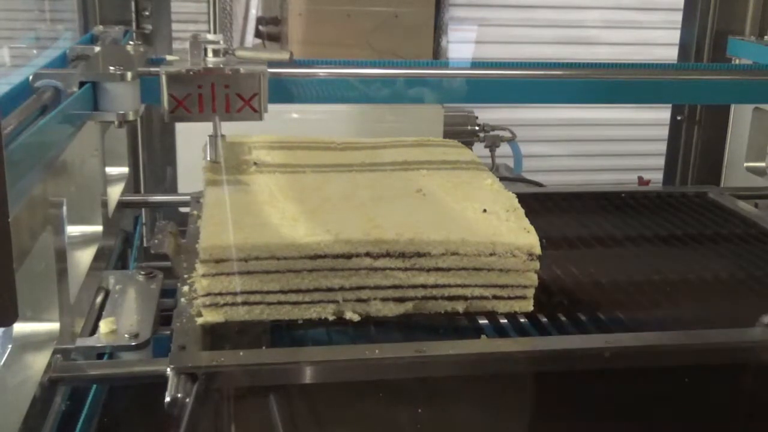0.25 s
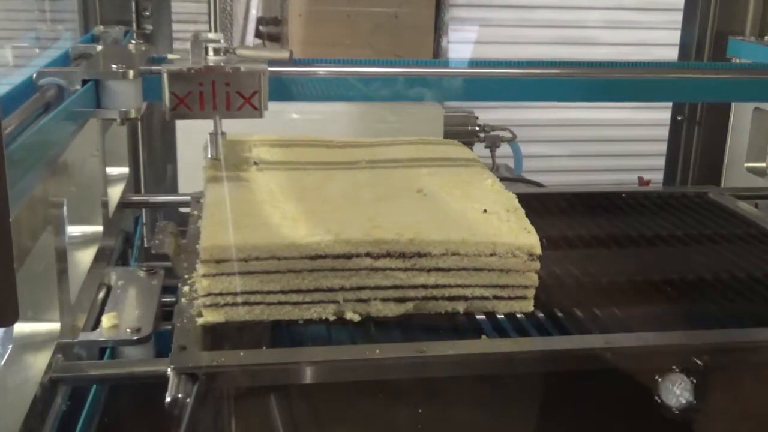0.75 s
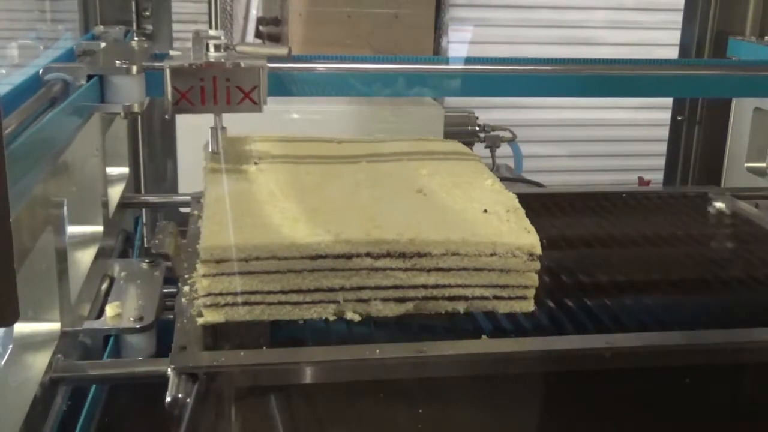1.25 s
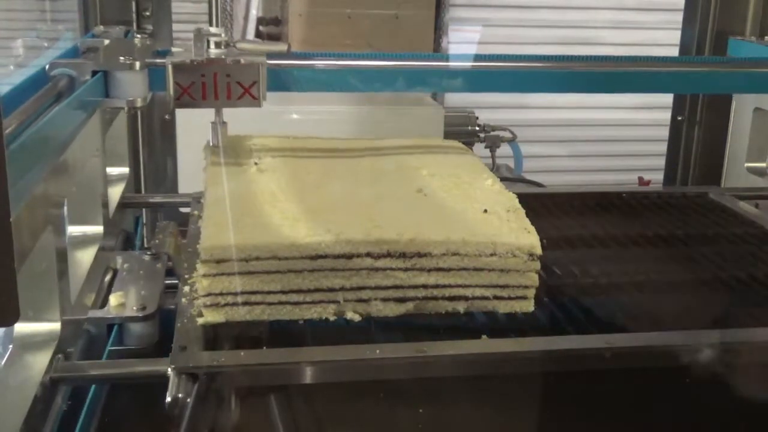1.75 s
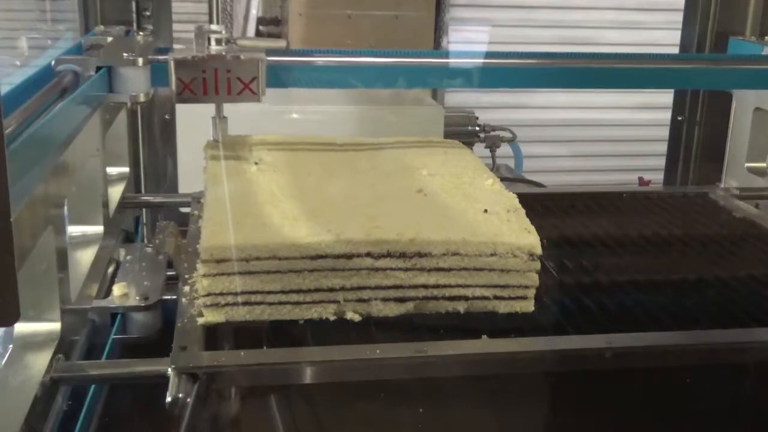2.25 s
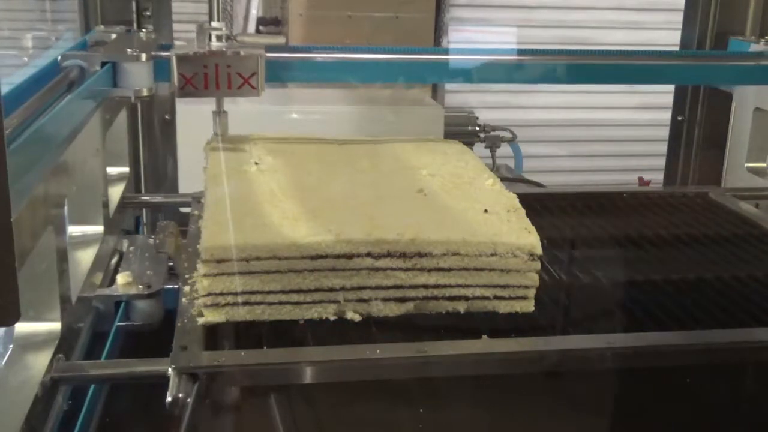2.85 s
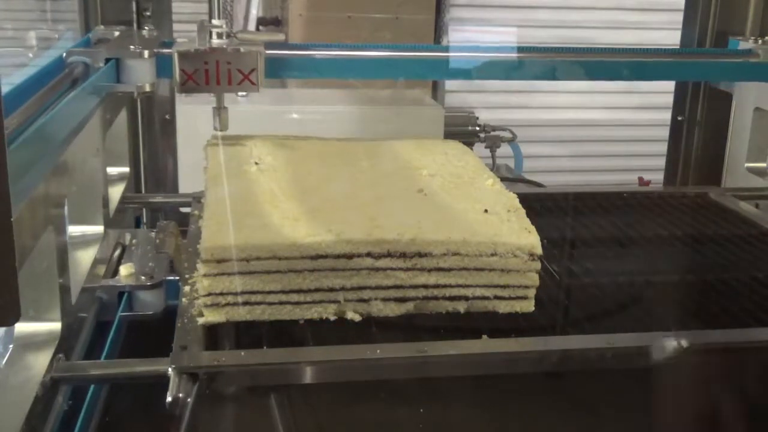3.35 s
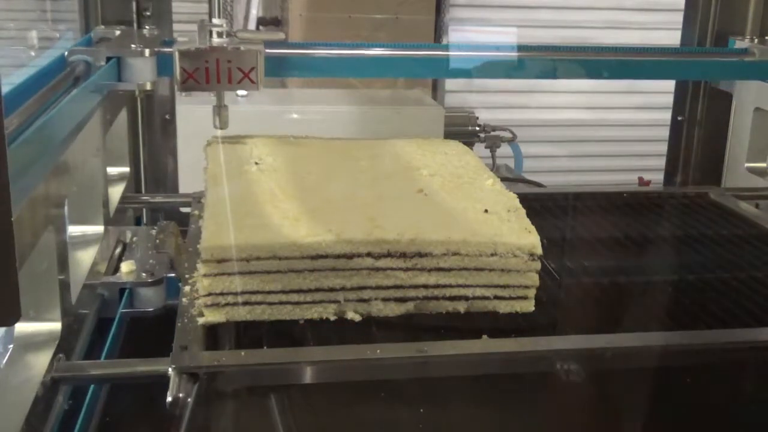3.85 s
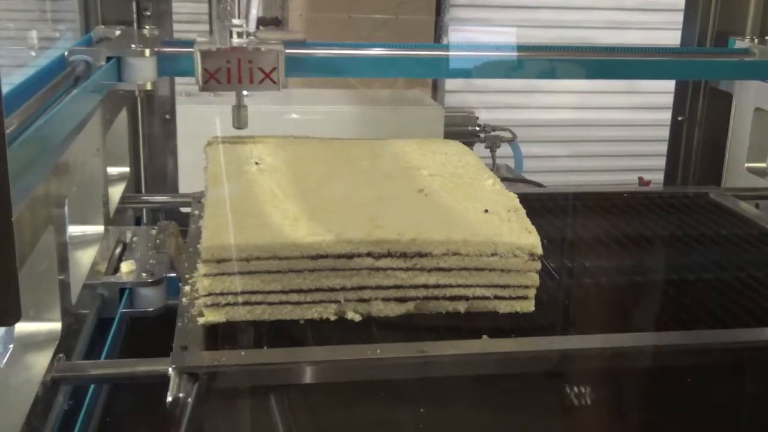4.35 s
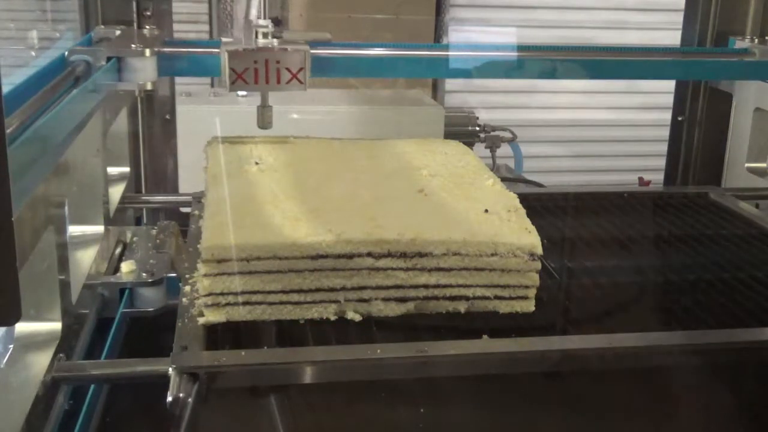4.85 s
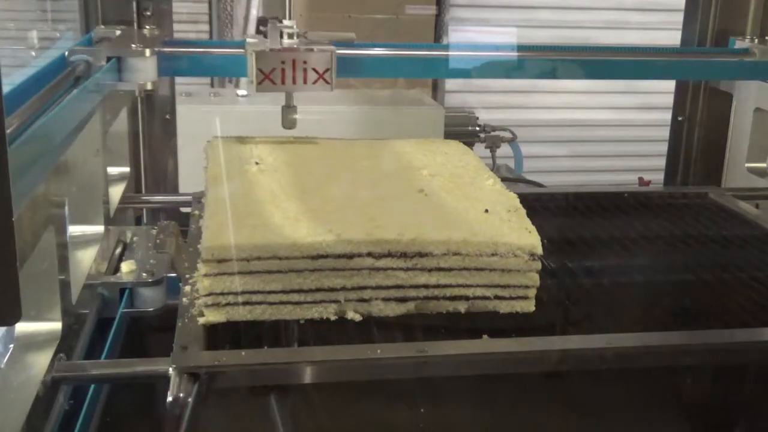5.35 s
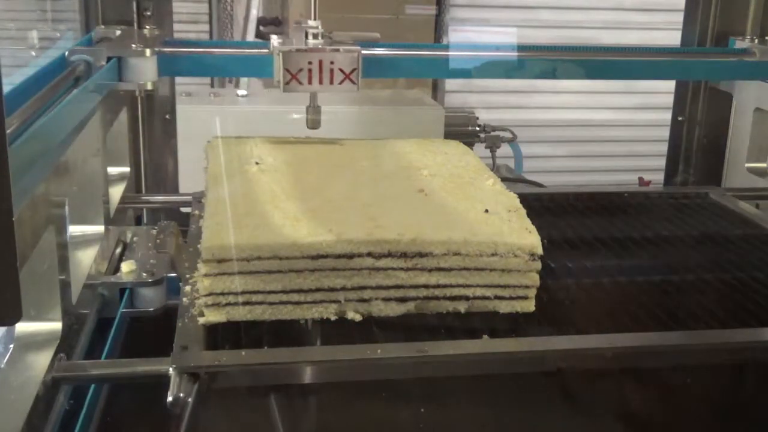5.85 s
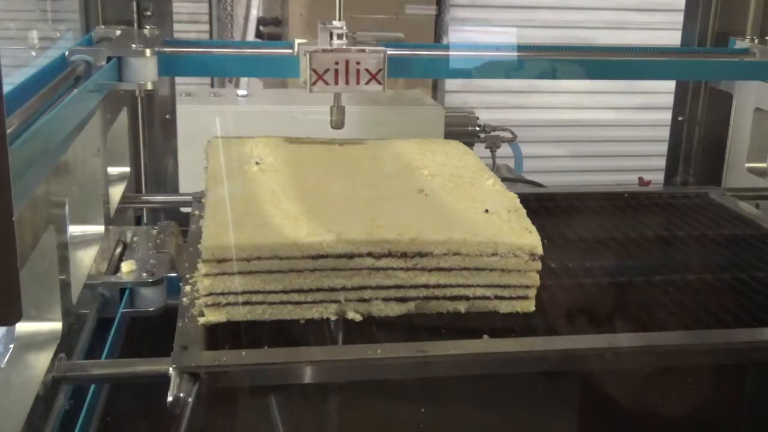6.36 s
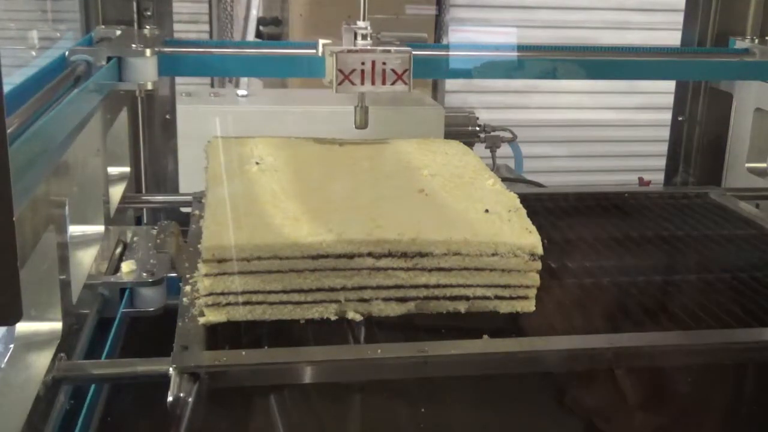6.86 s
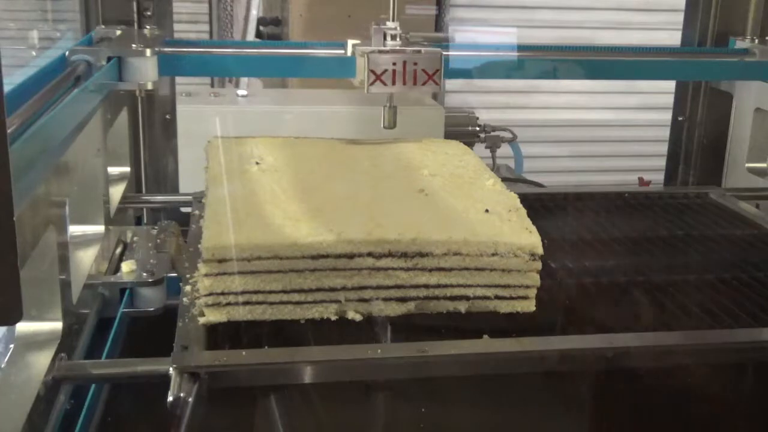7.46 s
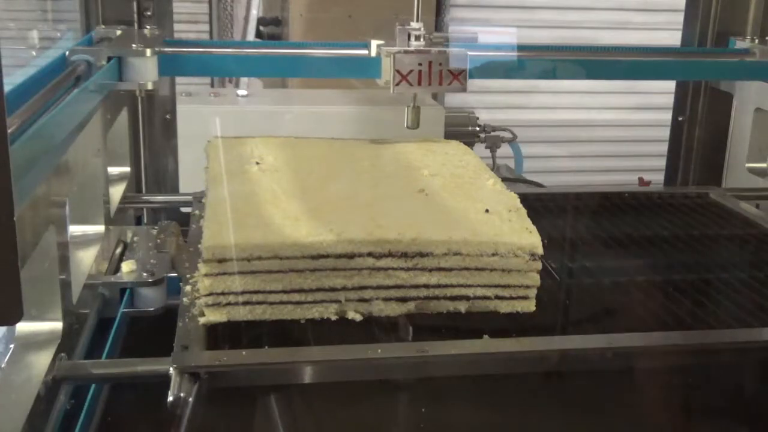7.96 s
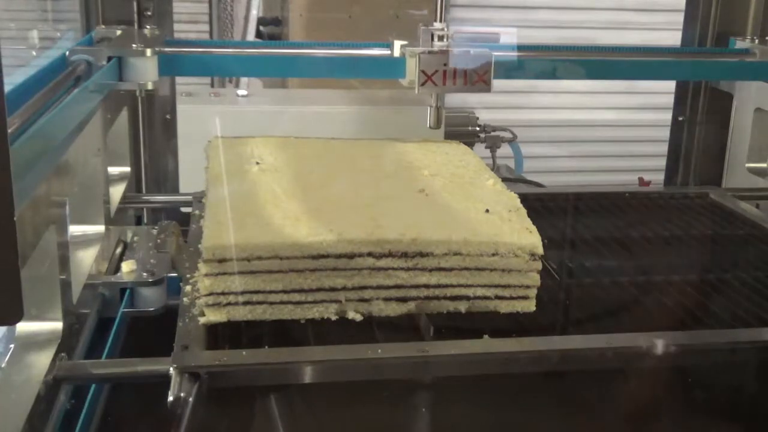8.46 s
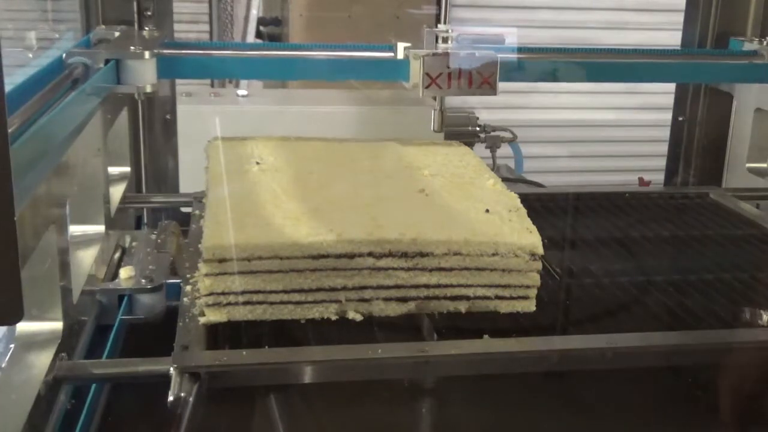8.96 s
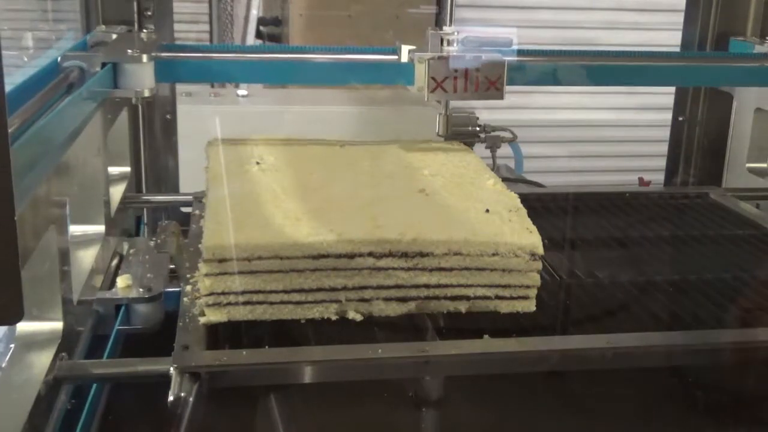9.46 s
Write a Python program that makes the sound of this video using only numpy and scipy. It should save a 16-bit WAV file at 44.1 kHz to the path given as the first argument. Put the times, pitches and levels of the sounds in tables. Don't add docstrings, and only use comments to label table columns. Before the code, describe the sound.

Steady mid-to-high pump whine and cooling-fan rush, heard in stereo from a few metres off in a workshop. A short air burst with rattling metal clicks comes first, then the whine swells and changes colour. After further puffs and taps, a fierce water-jet hiss takes over abruptly and stays, splashing and ringing metal slats, with a soft thud and groan of the frame midway. The recording level ducks the pumps beneath it.

```python
import sys
import numpy as np
from scipy import signal
from scipy.fft import rfft, irfft
from scipy.io import wavfile
from scipy.ndimage import uniform_filter1d, map_coordinates

SR = 44100
rng = np.random.default_rng(int(sys.argv[2]) if len(sys.argv) > 2 else 0)


def bounce(signal):
    frames = np.transpose(np.atleast_2d(signal))
    limited = np.clip(frames, -1, 1)
    pcm = np.round(limited * 32767).astype(np.int16)
    wavfile.write(sys.argv[1], SR, pcm)


def undo_db(level):
    steps = np.asarray(level, float) / 20
    return 10 ** steps


N = 427769
HZ, FRAME_S = np.fft.rfftfreq(2048, 1 / SR), np.arange(N // 512 + 5) * 512 / SR

# (time [s], speed [turns/s])
SHAFT_SPEED = [
    (0, 29.872),
    (3.8, 29.872),
    (4.0, 29.75),
    (5.5, 29.75),
    (5.8, 28.5),
    (5.9, 28.7),
    (6.08, 29.75),
    (9.7, 29.75),
]
# (order [per turn], level [dB rms], left minus right [dB], left lead [rad])
PISTON_ORDERS = [(9, -39, 0, -0.2), (18, -38, -1, -0.0), (27, -33, 3, -0.7), (36, -34, 0, 1.2),
                 (45, -35, 14, -1.1), (54, -42, 1, -0.4), (63, -46, -6, 0.1), (72, -55, 1, 0.7),
                 (81, -51, 2, -0.9), (90, -54, 6, -0.3), (99, -50, -3, -0.7), (108, -43, 4, 0.1),
                 (117, -52, -12, 0.3), (126, -48, 1, 1.7), (135, -49, 5, 0.0), (144, -47, 3, -0.1),
                 (153, -57, 4, 0.5), (162, -57, -6, -0.2), (171, -51, 1, 0.4), (180, -44, 7, -2.1),
                 (198, -57, 7, -0.6), (207, -58, -2, 1.3), (216, -44, 5, -0.6), (279, -59, -2, 0.1),
                 (324, -60, 0, -0.1), (333, -62, -2, -0.2)]
# (order [per turn], level [dB rms], left minus right [dB], left lead [rad])
GEAR_ORDERS = [(12, -41, 6, -1.0), (24, -37, 1, 0.4), (48, -54, 10, 0.3), (60, -49, 2, -0.2),
               (84, -60, -2, 0.1), (96, -44, 0, -0.1), (120, -55, 1, 0.1), (132, -55, 0, 0.0),
               (156, -47, 2, -0.3), (168, -46, -4, -0.4), (192, -48, 3, -0.7), (204, -45, 10, -2.0),
               (228, -58, -3, -1.9), (264, -56, -1, -0.2), (276, -56, -2, 0.1), (300, -56, 0, 0.1),
               (312, -63, 0, 0.1), (348, -63, -1, -0.1)]
# (order [per turn], level [dB rms], left minus right [dB], left lead [rad])
UNBALANCE_ORDERS = [(4, -54, 0, -0.1), (21, -53, -3, -0.0), (11, -55, 0, 0), (20, -55, 0, 0),
                    (23, -55, 0, 0), (39, -60, 0, 0), (41, -58, 0, 0), (49, -54, 0, 0), (145, -54, 0, 0),
                    (170, -54, 0, 0), (187, -59, 0, 0), (193, -55, 0, 0), (215, -54, 0, 0),
                    (217, -55, 0, 0), (40, -55, 0, 0), (42, -62, 0, 0), (44, -52, 4, 0), (50, -55, 0, 0),
                    (25, -47, 0, -0.7), (26, -48, 0, -0.5), (55, -55, 9, -0.8), (61, -53, 2, -1.2),
                    (62, -52, -3, -0.7), (65, -50, -11, 0.8), (70, -54, 2, 0.4), (74, -55, 5, -0.4),
                    (85, -55, 2, -0.3), (107, -52, 5, -0.4), (109, -50, 1, -0.1), (143, -56, 0, -0.4),
                    (155, -53, 2, -0.2), (157, -47.5, 3, 0.1), (167, -49, 9, -0.2), (169, -52, -3, -1.1),
                    (173, -53, 0, -1.0), (181, -54, 5, -0.8), (191, -48, 6, 0.9), (202, -54, 2, 0.3),
                    (205, -52, 1, 1.4), (278, -49, 0, -0.4), (347, -61, 2, -0.1), (350, -63, -2, -0.3),
                    (361, -69, 0, -0.1)]
# (frequency [Hz], level [dB])
FAINT_COLOUR = [(30, -20), (300, -7), (800, -2), (1200, 0), (2400, -9), (3000, 1), (4600, -5), (5600, 0),
                (7500, -11.5), (10000, 2), (11000, -24)]
FAINT_DB = -65
WOBBLING_ORDERS = np.array([26, 108])
# (time [s], share of full [1])
OIL_PRESSURE = [(0, .04), (.7, 0), (1.5, 0), (2.2, 0), (2.65, .05), (2.9, .4), (3.2, .9), (3.75, 1.02),
                (4.05, .8)]
PRESSED_ORDERS = (9, 12, 18, 24, 27, 45, 63, 156, 180)
PRESSED_FACTOR = [1.3, 1.5, .52, 1.05, 1.45, -.25 + .62j, 2.8, 1.7, 2.4]
PRESSED_TRIM = [-2.7, -4.6, -8, .4, 1.8, 2.4, -3.5, -2, -1]
# (time [s], share of full [1])
JET_LOAD = [(3.8, 0.52), (4.5, 0.94), (5.4, 1.05), (5.7, 0.31), (6.3, 1.1), (8, 1.16), (9.7, 1.24)]
LOADED_GAIN = [3, 8.5, 17.5, -6, -6]
# (order [per turn], left [dB], right [dB])
SAGGING_ORDERS = [
    (12, -1, -1),
    (24, -3.5, -3),
    (27, -.5, -5),
]
SWITCH_S, SWITCH_WIDTH_S = 2.75, .5
# (time [s], right level [dB rms], phase [rad])
GEAR_MESH = [(0, -28, -2), (.3, -30.5, -2.5), (.9, -39.5, -2.5), (1.4, -33.5, -2.5), (1.65, -39, -2.95),
             (1.9, -38, -3), (2.3, -40, 1), (2.55, -31.5, -0.4), (2.8, -23, -1.7), (2.97, -27, -2.5),
             (3.2, -36, 0.9), (3.5, -45, 1), (3.75, -45, -2)]
WHINE_DB = -1.4
SKIP_S, SKIP_SAMPLES = 1.93, 1024

# (frequency [Hz], density [dB per Hz])
FAN_COLOUR = [(45, -22), (75, -7.5), (110, -10), (165, -5.5), (195, -4.5), (300, -1), (470, -2.5),
              (670, 0.5), (1200, -0.5), (2000, -2.5), (2450, -5.5), (3000, -3), (5900, -3), (8700, -5.5),
              (11000, -14.5)]
FAN_DB = -34.5
# (frequency [Hz], left-right likeness [1])
FAN_LIKENESS = [(60, 1), (130, 0.89), (270, 0.95), (1200, 0.59), (5000, 0.31), (11000, 0.97)]
# (frequency [Hz], level [dB rms])
BLADE_TONES = [(166.9, -58.5), (672.9, -55.0)]

# (time [s], level [dB], hold [s], t60 [s], tilt [dB per octave])
VALVE_PUFFS = [
    (0.642, -23, 0.019, 0.097, 0.5),
    (0.689, -31.5, 0.018, .25, -2),
    (3.16, -37, .01, .08, 0.1),
    (3.247, -31, 0.076, 0.087, 1),
    (3.728, -26.5, 0.028, 0.17, 2),
]
# (frequency [Hz], density [dB per Hz])
PUFF_COLOUR = [(240, -38), (400, -22), (741, -8), (1370, 0), (1580, -17), (1740, -3), (2510, -4),
               (3820, -2.5), (7080, -7.5), (9910, -7), (11400, -34), (14800, -65), (22000, -120)]
# (frequency [Hz], width [Hz], level [dB])
VALVE_BODY = [(1880, 140, 5.5), (2630, 200, 9), (3300, 250, 3), (4560, 300, 7), (7140, 500, 7),
              (8850, 300, 1), (9880, 250, 6)]
TAIL_DB, TAIL_T60_S, TAIL_LOSS_DB_PER_S = -7, 0.76, 140

# (time [s], level [dB])
SPOOL_STRIKES = [(.650, -36), (.654, -29), (.658, -24), (.662, -27), (.666, -28), (.672, -30), (.678, -34),
                 (.688, -30), (.697, -34), (.703, -31), (.710, -34), (.724, -36), (.742, -37), (.762, -35),
                 (.798, -36), (.83, -38), (3.172, -38), (3.257, -34), (3.268, -33), (3.283, -34),
                 (3.293, -32), (3.304, -32), (3.317, -38), (3.739, -35), (3.745, -33), (3.756, -37),
                 (3.80, -31)]
# (frequency [Hz], level [dB], t60 [s])
SPOOL_MODES = [(1920, -14, .04), (2590, -3, .045), (3000, -5, .03), (3505, -1, .04), (4100, -4, .03),
               (4560, -1, .045), (5100, -2, .04), (6008, -6, .04), (6826, -6, .03), (7386, -2, .03),
               (8500, -5, .03)]

# (time [s], level [dB], frequency [Hz], width [Hz], t60 [s])
HEAD_TAPS = [(3.739, -30, 1900, 50, .3), (3.739, -30, 500, 300, .08), (3.74, -32, 1300, 300, .08),
             (3.815, -20, 1950, 120, .2), (3.82, -24, 1450, 200, .3), (4.075, -30, 298, 150, .3),
             (4.19, -20, 1250, 400, .1), (5.53, -23, 278, 80, 0.28), (.65, -25, 1350, 250, .05),
             (.658, -29, 850, 200, .07), (.68, -33, 1300, 300, .12), (3.738, -23, 5400, 900, .06),
             (3.799, -22, 5500, 900, .05), (3.862, -19, 1400, 200, .15), (5.475, -19, 2600, 500, .1),
             (5.435, -22, 900, 503, .15)]
# (time [s], level [dB], frequency [Hz], width [Hz],
# t60 [s])
SLOW_GROANS = [
    (4.1, -35, 211, 40, 2.5),
    (5.47, -31.5, 85, 30, .6),
    (5.75, -30, 231, 30, 2.3),
    (5.8, -18.5, 336, 4.1, 0.64),
    (5.9, -28, 264.4, 12.5, 1.4),
    (8.55, -22.5, 394, 10, 0.66),
]
# (frequency [Hz], width [Hz], level [dB], t60 [s])
FRAME_MODES = [(129, 50, -30, 0.47), (221, 22, -19, 0.48), (335, 77.6, -21, 0.69), (473, 80, -23, .4),
               (630, 36, -22, 0.32), (711, 50, -20, .3), (1150, 120, -21, 0.54)]
THUD_S = 5.454
TAP_RISE_S, GROAN_RISE_S, THUD_RISE_S = .004, 0.055, 0.017

JET_OPENS_S, JET_RISE_S, JET_DB, SETTLE_S = 3.792, 0.041, -19, 0.3
# (frequency [Hz], density [dB per Hz])
JET_COLOUR = [(110, -41), (230, -12), (480, -11), (800, -6), (1500, -2), (2200, -1.8), (4100, 2), (5200, 0),
              (5800, 1.45), (7150, -3), (7900, 0.2), (8800, 7.5), (9700, 5.5), (11000, -5)]
# (centre [Hz], width [octaves], gained over the cut [dB], while settling [dB])
JET_PARTS = [
    (810, 1.85, 6, -3.5),
    (4100, 0.69, 1.5, -0.5),
    (8900, 0.32, -2.5, -0.5),
]
# (time [s], depth share [1], splash share [1])
CUT_DEPTH = [(3.8, 0.018, .1), (4.4, 0.27, 0.5), (5.1, 0.14, 0.19), (5.9, 0.21, 0.46), (6.7, 0.27, 0.56),
             (7.4, 0.46, 0.8), (7.9, 0.61, 0.62), (8.7, 0.59, 0.4), (9.2, 1.3, 0.71), (9.7, 1.2, 0.87)]
# (time [s], centre [Hz], level [dB])
SLOT_RING = [(3.8, 4100, -0.5), (5, 3900, 0), (5.8, 3800, 0.5), (6.3, 3700, 1), (6.8, 3840, 2),
             (7.2, 3700, 0.5), (7.7, 4150, 3.5), (8.1, 3900, 1), (8.6, 4000, 3), (9.0, 4380, 1),
             (9.4, 4440, 3.5), (9.7, 4330, 0.5)]
SLOT_WIDTH_HZ = 620
# (frequency [Hz], width [Hz], level [dB])
TANK_RINGS = [(218.4, 31, 5), (313, 41, -13), (397, 40, 1), (463, 72, -6), (658, 34, -12), (717, 29, 8),
              (900, 29, 7), (946, 28, -11), (1400, 81, -3), (1154, 35, 5), (1368, 15, 10), (1630, 24, 6),
              (1772, 19, 7.5), (1937, 14, 7), (2082, 35, 7), (2262, 30, 7.5), (2448, 14, 11),
              (2772, 19, 10), (3380, 33, 2), (3740, 32, -1), (4000, 16, 1), (6480, 19, 7.5), (7900, 50, 3),
              (8220, 59, 5.5), (8550, 40, 3), (8820, 30, 2), (8725, 25, 3.5), (8930, 23, 2.5)]
# (time [s], half length [s], frequency [Hz], width [Hz],
# level [dB])
PASSING_RINGS = [(3.95, 0.14, 1600, 300, -3), (4.35, .35, 1870, 38, 5), (4.5, 0.77, 1150, 56, 1.5),
                 (4.6, .5, 470, 120, -5), (4.8, 0.44, 2500, 150, 2), (5.15, 0.17, 1800, 250, -1),
                 (5.7, 0.49, 1420, 40, 10), (6.7, .35, 1630, 46, 8), (6.65, 0.22, 1000, 400, 4.5),
                 (7.2, 0.38, 1100, 60, 4), (7.55, 0.42, 930, 70, 5.5), (7.8, 0.23, 1600, 300, -3),
                 (8.3, 0.35, 1170, 200, -3.5), (8.1, 0.49, 427, 120, 8), (8.4, .5, 2000, 80, -2),
                 (9.3, 0.56, 1670, 60, 7), (9.6, 0.47, 430, 120, 5.5), (4.1, .2, 320, 150, 5),
                 (5.1, 0.18, 1150, 300, 2.5), (5.7, 0.18, 780, 120, -1), (4.02, .05, 2300, 1400, -2.5),
                 (5.75, .15, 1620, 80, -4), (6.85, 0.18, 1500, 400, 1.5), (7.1, .2, 6500, 1500, 1),
                 (8.2, 0.74, 1010, 100, 4), (5.0, .3, 430, 80, -4), (6.1, 0.22, 680, 300, 3),
                 (9.35, .2, 1050, 230, 2.5), (8.6, .2, 3200, 800, 1), (6.4, .2, 6100, 1500, -1.5),
                 (6.1, .25, 280, 120, 4), (7.3, .9, 3800, 370, 1), (6.3, 0.18, 3100, 600, -1.5),
                 (6.85, .3, 5700, 900, -1), (6.9, 0.19, 2100, 700, -3), (7.3, .2, 3100, 800, 1.5),
                 (8.1, .3, 2600, 300, 2)]
# (frequency [Hz], left-right likeness [1])
JET_LIKENESS = [(60, .98), (200, 1), (480, 0.88), (1360, 0.8), (3870, 0.84), (6200, 0.73), (8600, 0.96),
                (11000, 0.83)]
# (frequency [Hz], left minus right [dB])
JET_PAN = [(60, 0.0), (170, 0.0), (480, -0.89), (1360, 0.31), (3870, -1.8), (11000, 0.77)]
# (time [s], gain [dB])
GAIN_CONTROL = [
    (3.804, 2),
    (3.827, -12),
    (3.87, -14),
    (4.0, -14.5),
]


def evened(x):
    return x / np.sqrt(np.mean(x ** 2) + 1e-20)


def read(points, hz):
    f, value = np.transpose(points)
    return np.interp(np.log(hz + 1), np.log(f + 1), value)


def columns(rows, t):
    s, *values = np.transpose(rows)
    return [np.interp(t, s, v) for v in values]


def bell(t, centre, width):
    return np.exp(-((t - centre) / width) ** 2)


def drift(shape, *spans):
    field = rng.standard_normal(shape)
    for axis, span in enumerate(spans):
        for _ in range(2):
            field = uniform_filter1d(field, round(span), axis)
    return evened(field)


def rings(modes, hz):
    return [db / (1 + ((hz - centre) / (width / 2)) ** 2) for centre, width, db in modes]


def hiss(field_db, likeness, pan_db):
    a, b, c, d = rng.standard_normal((4, len(FRAME_S), len(HZ)))
    same = np.clip(read(likeness, HZ), -1, 1)
    left = a + 1j * b
    right = same * left + np.sqrt(1 - same ** 2) * (c + 1j * d)
    z = np.array([left * undo_db(pan_db / 2), right / undo_db(pan_db / 2)])
    z = np.swapaxes(z * undo_db(field_db), 1, 2)
    return evened(signal.istft(z, nperseg=2048, noverlap=1536)[1][:, :N])


def shaft_orders(t, scatter_db=4, wander_db=0.75, faint_wander_db=3, slip=0.036):
    order = np.arange(372)
    level = FAINT_DB + read(FAINT_COLOUR, order * SHAFT_SPEED[0][1]) + scatter_db * rng.standard_normal(372)
    pan, lead = 4 * rng.standard_normal(372), 0.87 * rng.standard_normal(372)
    wander = np.full(372, float(faint_wander_db))
    for k, db, pan_db, radians in PISTON_ORDERS + GEAR_ORDERS + UNBALANCE_ORDERS:
        level[k], pan[k], lead[k], wander[k] = db, pan_db, radians, wander_db
    level = level + wander * drift((len(t), 372), 3)
    pressure, load = columns(OIL_PRESSURE, t)[0], columns(JET_LOAD, t)[0]
    level[:, (9, 12, 18, 27, 45)] += np.outer(load, LOADED_GAIN)
    level[:, 27] -= 12 * bell(t, 5.75, .3)
    phase = 2 * np.pi * rng.random(372) + slip * drift((len(t), 372), 3) * np.sqrt(order / 100)
    below, above = np.subtract(WOBBLING_ORDERS, 1), np.add(WOBBLING_ORDERS, 1)
    phase[:, np.array(WOBBLING_ORDERS)] = (phase[:, below] + phase[:, above] - np.pi) / 2
    share = np.sqrt(2 / (1 + undo_db(-2 * np.array([pan, -pan]))))[:, None]
    z = undo_db(level) * share * np.exp(1j * (phase + np.array([lead, -lead])[:, None] / 2))
    z[..., PRESSED_ORDERS] *= undo_db(PRESSED_TRIM) * (1 + np.outer(pressure, np.subtract(PRESSED_FACTOR, 1)))
    for k, left_db, right_db in SAGGING_ORDERS:
        z[..., k] *= undo_db(np.outer([left_db, right_db], bell(t, SWITCH_S, SWITCH_WIDTH_S)))
    z[1, :, 45] -= .8 * bell(t, 3.05, .16) * z[0, :, 45]
    z[..., 63] *= undo_db(9 * np.exp(-t / .55))
    s, db, radians = np.transpose(GEAR_MESH)
    mesh = np.interp(t, s, undo_db(db) * np.exp(1j * radians))
    steady = undo_db(-33) * (1 + pressure * (1.16 - 1))
    z[..., 36] = [steady + undo_db(-7) * np.exp(1j * -0.2) * mesh, mesh]
    return z


def pumps():
    t = np.arange(0, N / SR + .2, .05)
    size = 2 ** 13
    turn = irfft(shaft_orders(t), size) * size / np.sqrt(2)
    turn = np.concatenate([turn, turn[..., :1]], axis=2)
    now = np.arange(N + SKIP_SAMPLES) / SR
    angle = np.cumsum(columns(SHAFT_SPEED, now)[0]) / SR % 1
    place = [now / t[1], angle * size]
    whine = np.array([map_coordinates(side, place, order=1) for side in turn])
    fade = np.clip((now[:N] - SKIP_S) / 0.01 + .5, 0, 1) * np.pi / 2
    return np.cos(fade) * whine[:, :N] + np.sin(fade) * whine[:, SKIP_SAMPLES:]


def fans():
    shape, t = (len(FRAME_S), len(HZ)), np.arange(N) / SR
    field = read(FAN_COLOUR, HZ) + 1.6 * drift(shape, 4, 12) + 1.6 * drift(shape, 110, 2)
    waver = [np.interp(t, FRAME_S, w) for w in drift((shape[0], 4), 3).T]
    tones = np.zeros(N)
    for k, (hz, db) in enumerate(BLADE_TONES):
        tones += undo_db(db + 1.5 + 1.3 * waver[k]) * np.sin(2 * np.pi * hz * t + 0.47 * waver[k + 2])
    return undo_db(FAN_DB) * hiss(field, FAN_LIKENESS, np.zeros(len(HZ))) + tones


def puffs():
    t, out = np.arange(N) / SR, np.zeros((2, N))
    for s, db, hold, t60, tilt_db in VALVE_PUFFS:
        age = t[round(s * SR):][:SR // 2] - s
        z = rfft(rng.standard_normal((3, len(age))))
        hz = np.fft.rfftfreq(len(age), 1 / SR)
        body_db = min(1, 0.024 / hold) ** 2 * sum(rings(VALVE_BODY, hz))
        colour_db = read(PUFF_COLOUR, hz) + body_db + tilt_db * np.log2((hz + 1) / 3000)
        air = irfft(z * undo_db(colour_db), len(age))
        burst = undo_db(-60 * np.maximum(age - hold, 0) / t60)
        tail = undo_db(TAIL_DB - TAIL_LOSS_DB_PER_S * hold - 60 * age / TAIL_T60_S)
        puff = evened(air[0] + 0.4 * air[1:]) * (burst + tail) * np.clip(age / 0.017, 0, 1)
        out[:, round(s * SR):][:, :len(age)] += undo_db(db) * puff
    return out


def spool():
    age, out = np.arange(SR // 4) / SR, np.zeros((2, N))
    hz, mode_db, t60 = np.transpose(SPOOL_MODES)[..., None]
    for s, db in SPOOL_STRIKES:
        mixture, phase, pan_db, detune = rng.standard_normal((4, len(SPOOL_MODES), 1))
        tone = np.sin(2 * np.pi * hz * (1 + .012 * detune) * age + 2 * phase)
        ring = undo_db(db + mode_db + 3 * mixture - 60 * age / t60) * tone * np.minimum(age / 0.00097, 1)
        sides = [(ring * undo_db(side * 1.5 * pan_db)).sum(0) for side in (1, -1)]
        out[:, round(s * SR):][:, :len(age)] += sides
    return out


def knocks():
    age, out = np.arange(SR) / SR, np.zeros(N)
    blows = [(*row, TAP_RISE_S) for row in HEAD_TAPS]
    blows += [(*row, GROAN_RISE_S) for row in SLOW_GROANS]
    blows += [(THUD_S, db, hz, width, t60, THUD_RISE_S) for hz, width, db, t60 in FRAME_MODES]
    for s, db, hz, width, t60, rise in blows:
        r = np.exp(-np.pi * width / SR)
        slow = signal.lfilter([1], [1, -2 * r, r * r], rng.standard_normal((2, 2 * SR)))[:, SR:]
        body = np.sin(2 * np.pi * hz * age + np.arctan2(*slow))
        ring = evened(body) * np.clip(age / rise, 0, 1)
        out[round(s * SR):][:len(age)] += undo_db(db - 60 * age / t60) * ring
    return signal.sosfilt(signal.butter(3, 60, "highpass", fs=SR, output="sos"), out)


def jet_field(surge_db=0.28, ripple_db=2.0, patchy_db=.5, flicker_db=.25, ring_drift=.15):
    depth, wet = columns(CUT_DEPTH, FRAME_S)
    settling = np.exp(-(np.maximum(FRAME_S - JET_OPENS_S, 0) / SETTLE_S) ** 3)
    shape = (len(FRAME_S), len(HZ))
    field = np.tile(read(JET_COLOUR, HZ), (shape[0], 1))
    for control, (hz, octaves, gained_db, settling_db) in zip((wet, depth, depth), JET_PARTS):
        reach = np.exp(-(np.log2((HZ + 1) / hz) / octaves) ** 4)
        field += np.outer(gained_db * (control - .5) + settling_db * settling, reach)
    slot_hz, slot_db = columns(SLOT_RING, FRAME_S)
    field += slot_db[:, None] * bell(HZ, slot_hz[:, None], SLOT_WIDTH_HZ)
    for ring_db in rings(TANK_RINGS, HZ):
        field += ring_db * (1 + ring_drift * drift((shape[0], 1), 30))
    for s, length, *mode in PASSING_RINGS:
        field += np.outer(bell(FRAME_S, s, length), rings([mode], HZ)[0])
    field += ripple_db * drift(shape, 40, 2)
    field += patchy_db * drift(shape, 5, 12) + flicker_db * drift(shape, 2, 180)
    return field + surge_db * drift((shape[0], 1), 4)


def jet(spray_db=-16):
    flow = hiss(jet_field(), JET_LIKENESS, read(JET_PAN, HZ))
    drops = undo_db(2.8 * np.minimum(rng.exponential(1, N), 4)) * (rng.random(N) < 300 / SR)
    splash = signal.oaconvolve(drops, undo_db(-60 * np.arange(900) / SR / 0.012))[:N]
    middle = signal.sosfilt(signal.butter(2, [2000, 7000], "bandpass", fs=SR, output="sos"), flow)
    kicked = flow + undo_db(spray_db) * evened(splash - splash.mean()) * middle
    opening = np.clip((np.arange(N) / SR - JET_OPENS_S) / JET_RISE_S, 0, 1) ** 1.73
    return undo_db(JET_DB - GAIN_CONTROL[-1][1]) * evened(kicked * opening)


def scene():
    return undo_db(WHINE_DB) * pumps() + fans() + puffs() + spool() + knocks() + jet()


def low_pass(x):
    return signal.sosfilt(signal.butter(12, 11550, fs=SR, output="sos"), x)


def record(dry):
    ducked = dry * undo_db(columns(GAIN_CONTROL, np.arange(N) / SR)[0])
    edge = signal.firwin(1023, 11040, window=("kaiser", 7), fs=SR)
    mix = signal.oaconvolve(ducked, edge[None], "same")
    return low_pass(mix)


dry = scene()
out = record(dry)
bounce(out)
```